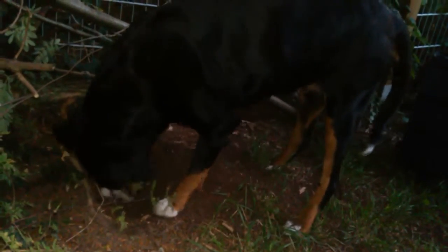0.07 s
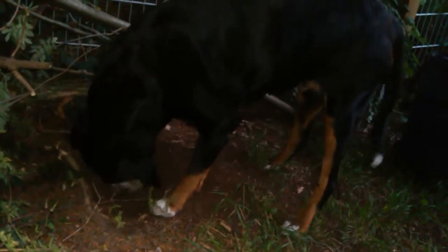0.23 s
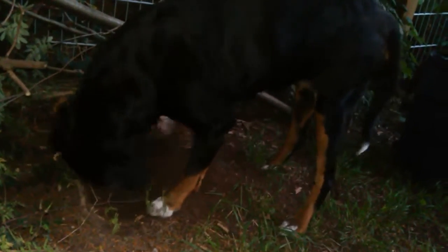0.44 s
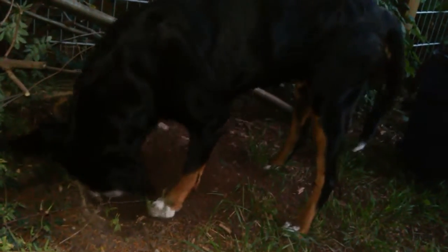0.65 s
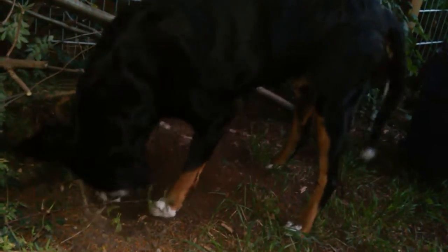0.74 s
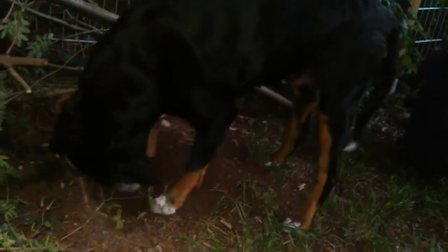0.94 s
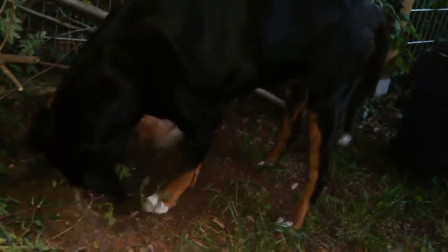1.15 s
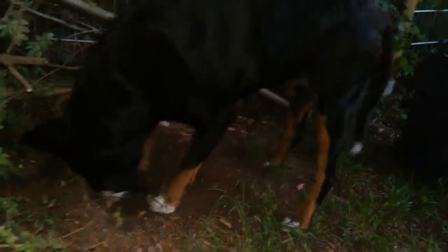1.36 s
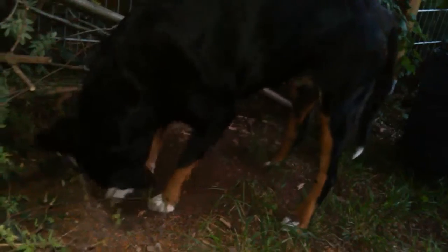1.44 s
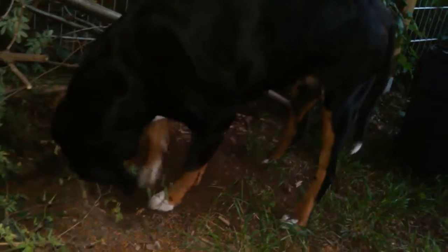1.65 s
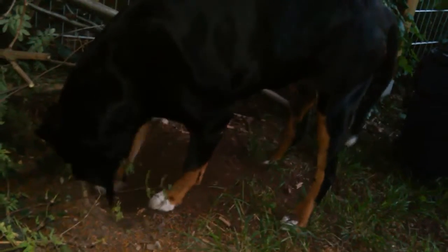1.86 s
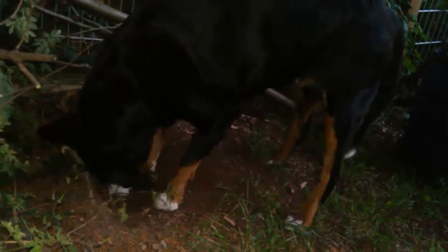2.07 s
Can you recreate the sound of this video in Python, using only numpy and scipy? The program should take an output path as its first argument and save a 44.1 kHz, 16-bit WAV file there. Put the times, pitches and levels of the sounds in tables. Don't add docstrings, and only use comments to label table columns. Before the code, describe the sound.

Close dog digging outdoors: one short earthy scrape, a dense spray of grit and dry leaves with tiny metallic chinks, near quiet, then a heavier scrape breaking clods, ending with a soft paw step and twig crackle.

```python
import sys
import numpy as np
from scipy import signal
from scipy.fft import rfft, irfft
from scipy.io import wavfile

SR = 44100
rng = np.random.default_rng(int(sys.argv[2]) if len(sys.argv) > 2 else 0)


def volts(x):
    e = np.asarray(x, float) / 20
    return 10 ** e


def store_wav(level_fs):
    pcm = np.round(np.clip(np.atleast_2d(level_fs), -1, 1) * 32767)
    wavfile.write(sys.argv[1], SR, pcm.T.astype(np.int16))


N = 92610
T = np.arange(N) / SR


def rms_one(x):
    return x / np.sqrt(np.mean(x ** 2) + 1e-20)


def at_hz(points, hz):
    point_hz, db = np.transpose(points)
    return np.interp(np.log(hz), np.log(point_hz), db)


def butter(x, hz, side, order=2):
    return signal.sosfilt(signal.butter(order, hz, side, fs=SR, output="sos"), x)


def drift(rate_hz):
    r = np.exp(-2 * np.pi * rate_hz / SR)
    noise = rng.standard_normal(N + SR)
    return rms_one(signal.lfilter([1], [1, -2 * r, r * r], noise)[SR:])


def ring(clicks, hz, t60_s):
    w = 2 * np.pi * hz / SR
    out = clicks + 1e-18
    for decay_s in (t60_s, t60_s / 5):
        r = volts(-60 / (decay_s * SR))
        out = signal.lfilter([.5, 0, -.5], [1, -2 * r * np.cos(w), r * r], out)
    return out * 3 * (1 - r)


def click(s, db):
    out = np.zeros(N)
    out[int(s * SR)] = volts(db)
    return out


def burst(s, peak_db, t60_s, edge_hz=None):
    t = np.arange(4096) / SR
    puff = volts(-60 * t / t60_s) * rng.standard_normal(len(t))
    if edge_hz:
        puff = butter(puff, edge_hz, "high", order=4)
    out = np.zeros(N + len(t))
    start = int(s * SR)
    out[start:start + len(t)] = volts(peak_db) * puff / np.abs(puff).max()
    return out[:N]


def grains(per_s, spectrum, span_hz, spread_db, clump_db, cycles, count=24):
    clump = clump_db * (drift(70) + .15 * drift(11))
    sizes = volts(spread_db * np.minimum(rng.exponential(1, N), 5) + clump) * rng.choice([-1, 1], N)
    born = rng.random(N) < per_s * volts(clump) / SR
    pitch = rng.integers(0, count, N)
    out = np.zeros(N)
    for k, hz in enumerate(np.geomspace(*span_hz, count)):
        hits = sizes * born * (pitch == k)
        out += volts(at_hz(spectrum, hz)) * hz * ring(hits, hz, cycles / hz)
    return rms_one(out)


# (frequency [Hz], density [dB per Hz])
YARD_SPECTRUM = [(15, 2.5), (25, -3.5), (48, -6), (115, -13), (300, -22.5), (655, -15.5), (1080, -24),
                 (3000, -30.5), (5000, -34), (9000, -41)]


def yard():
    hz = np.arange(N // 2 + 1) * SR / N + 1
    shape = volts(at_hz(YARD_SPECTRUM, hz)) * (hz < YARD_SPECTRUM[-1][0])
    air = irfft(rfft(rng.standard_normal(N)) * shape, N)
    return volts(-59.5 + 0.87 * drift(1)) * rms_one(air)


def tread():
    s, level_db, _ = np.transpose(STIR)
    murmur = rms_one(butter(rng.standard_normal(N), (51.6, 160.5), "band"))
    follows = 0.34
    return volts(-55.5 + follows * (np.interp(T, s, level_db) + 32.0)) * murmur


# (time [s], peak [dB], pitch [Hz], second touch after [s])
STEPS = [
    (.725, -40, 507, 0.014),
    (1.352, -51, 606, 0.0075),
    (1.9733, -40.5, 727, .014),
]


def steps():
    knock_cycles, push_hz, push_db, push_t60_s = 16, 240, -5.5, 0.03
    slap_hz, slap_db, slap_lag_s = 1760, -1, 0.00203
    out = np.zeros(N)
    for s, db, hz, after_s in STEPS:
        touches = click(s, db) - click(s + after_s, db - 3) + burst(s, db - 19, 2 * push_t60_s)
        out += ring(touches, hz, knock_cycles / hz)
        out += volts(push_db) * ring(touches, push_hz, push_t60_s)
        out += volts(slap_db) * ring(click(s + slap_lag_s, db), slap_hz, knock_cycles / slap_hz)
    return out


# (time [s], peak [dB], low edge [Hz])
CRACKS = [(.001, -36, 5500), (0.015, -24, 5800), (.026, -23, 5800), (0.077, -24, 9100), (.159, -29, 12000),
          (.305, -9.5, 5870), (.350, -23, 5950), (.369, -31, 8000), (.389, -19, 8000), (.412, -19, 8000),
          (0.465, -19, 8000), (.554, -22, 9000), (.655, -19, 8900), (0.802, -13, 4500), (.809, -14, 5000),
          (.824, -3, 7000), (.901, -10, 6500), (0.964, -17, 7000), (1.021, -15, 5000), (1.088, -13.5, 8100),
          (1.115, -23, 6000), (1.318, -33, 5040), (1.346, -26, 9000), (1.411, -33, 6500),
          (1.432, -26, 6000), (1.465, -26, 9000), (1.498, -25, 9000), (1.529, -28, 6000),
          (1.631, -19, 7000), (1.828, -34, 9000), (1.875, -36, 9000), (1.885, -32, 5500),
          (1.916, -28, 9500), (1.947, -37, 6800), (1.966, -42, 6000), (1.974, -23.5, 6000),
          (1.989, -36, 6000), (1.9935, -32, 8900), (2.008, -37, 8500), (2.013, -37, 8500),
          (2.027, -41, 6500), (2.052, -48, 6000), (2.06, -45, 8500), (2.068, -46, 7500)]


def cracks():
    return sum(burst(s, db + 3, .011, edge_hz) for s, db, edge_hz in CRACKS)


# (time [s], peak [dB], first pitch [Hz], second pitch [Hz], second relative [dB])
SNAPS = [(.072, -40.5, 3130, 6500, 1), (.148, -49, 4600, 4100, 4), (.448, -32.5, 3250, 1960, -7.5),
         (.954, -33, 2020, 2600, -6), (1.436, -53, 1910, 2920, -10), (1.988, -50, 2130, 3300, -3),
         (2.01, -54, 1900, 2640, 4), (2.027, -50, 2100, 3300, 3), (2.067, -55.5, 2200, 3560, 3),
         (0.213, -23, 1350, 2630, -10), (0.5801, -28, 1680, 4800, 6), (0.5815, -22.5, 6000, 3920, -7),
         (0.778, -24.5, 1650, 3230, -2), (.822, -26, 1800, 2900, -13), (0.829, -26.5, 1760, 2360, -1),
         (.880, -30.5, 2340, 1780, -4), (.886, -37.5, 1980, 2430, -5), (.922, -33, 2270, 2700, -14),
         (.812, -34, 2520, 3250, 0), (0.941, -29, 1760, 2300, -1), (1.015, -38, 1790, 3000, 0),
         (1.0407, -26, 3020, 5120, 11), (1.0397, -13.5, 5900, 9200, -2.5), (1.318, -51, 2440, 3260, 0.5),
         (1.49, -36, 2300, 3380, -2), (1.551, -24, 2350, 4170, 3), (1.54, -24, 946, 1790, -7.5),
         (1.591, -29, 1660, 2370, 7), (1.651, -23, 900, 2550, -4), (1.662, -29, 1450, 3700, -6),
         (1.9743, -37, 1840, 2410, 1), (1.977, -37, 3350, 4770, 10)]


def snaps():
    first_cycles, second_cycles = 18.0, 30.0
    out = np.zeros(N)
    for s, db, first_hz, second_hz, second_db in SNAPS:
        out += ring(click(s, db), first_hz, first_cycles / first_hz)
        out += ring(click(s, db + second_db), second_hz, second_cycles / second_hz)
    return out


# (time [s], peak [dB], upper modes relative [dB])
CHINKS = [
    (.768, -25, 0),
    (0.777, -29, 12),
    (0.7824, -15.5, 5.5),
    (0.8076, -25, -5),
    (.827, -27, -1),
    (0.8447, -13, 4),
    (.852, -24, -8),
    (0.864, -37, 0),
    (.955, -35, -6),
]
# (frequency [Hz], level [dB], t60 [s])
TAG_MODES = [(6560, 0, .009), (9120, 0, .005), (11100, -7, .004), (12900, -11, .004), (15100, -8, .004)]


def tag():
    slide_t60_s, slide_db, pitch_wander = 0.0025, -7, .015
    off = 1 + pitch_wander * rng.standard_normal((len(CHINKS), len(TAG_MODES)))
    rough = rng.uniform(.3, 1.3, N)
    out = np.zeros(N)
    for k, (hz, mode_db, t60_s) in enumerate(TAG_MODES):
        drive = np.zeros(N)
        for i, (s, peak_db, upper_db) in enumerate(CHINKS):
            slide = (T >= s) * volts(peak_db + slide_db - 60 * np.clip(T - s, 0, 1) / slide_t60_s)
            drive += np.sin(2 * np.pi * T * hz * off[i, k]) * slide * volts(mode_db + upper_db * (k > 0))
        out += ring(rough * drive, hz, t60_s)
    return out


# (time [s], level [dB], coarse crumbs relative [dB])
STIR = [(0, -36, -9), (0.127, -46, -14), (0.179, -38, -16.5), (.225, -29, -8.5), (0.482, -30.5, -11.5),
        (0.631, -40.5, -14), (0.757, -30, -12), (0.833, -15, -13), (0.972, -29.5, -8), (1.141, -35.5, -12),
        (1.235, -51.5, -15), (1.309, -52, -19), (1.33, -46.5, -18.5), (1.532, -29, -9.5),
        (1.704, -21.5, -9), (1.954, -56, -12), (1.999, -41, -7), (2.1, -58, -9.5)]
# (frequency [Hz], density [dB per Hz])
GRIT_SPECTRUM = [(4300, -12), (5400, -7), (6310, 0.5), (8590, -7), (10600, 3), (13200, 5.5), (14700, 7),
                 (15700, -15.5)]
# (frequency [Hz], density [dB per Hz])
CRUMB_SPECTRUM = [(240, -31), (400, -26.5), (456, -10), (1110, -17.5), (1760, -5.5), (1980, -9.5),
                  (2420, -4.5), (3790, -7.5), (5500, 2), (7150, -32), (12100, -120)]


def rustle():
    s, level_db, coarse_db = np.transpose(STIR)
    stir_db = np.interp(T, s, level_db)
    many = volts(.35 * (stir_db + 30))
    grit = grains(40000 * many, GRIT_SPECTRUM, (4300, 16000), spread_db=3.0, clump_db=1.0, cycles=16.0)
    crumbs = grains(9000 * many, CRUMB_SPECTRUM, (300, 5500), spread_db=3.1, clump_db=1.2,
                    cycles=14.0, count=32)
    pebbles = grains(900 * many, GRIT_SPECTRUM, (6500, 14000), spread_db=3.5, clump_db=2.0,
                     cycles=5.0, count=6)
    mix = grit + volts(-10.5) * pebbles + volts(np.interp(T, s, coarse_db)) * crumbs
    return volts(stir_db + 0.04) / np.sqrt(many) * mix


# (claws bite [s], pad lands [s], full weight [s], lets go [s], level [dB])
RAKES = [
    (.183, .184, .215, .265, -27),
    (1.533, 1.553, 1.595, 1.63, -23),
]


def stroke(fade_db_per_s, lag_s=0, start=1, bite_db_per_s=269):
    t = T - lag_s
    sag_db = -6.5
    out = np.zeros(N)
    for row in RAKES:
        full_s, go_s, level_db = row[2:]
        times = [full_s - 1, full_s, go_s, go_s + 1]
        press_db = np.interp(t, times, [-bite_db_per_s, 0, sag_db, -fade_db_per_s])
        out += (t > row[start] - lag_s) * volts(level_db + press_db)
    return out


# (frequency [Hz], density [dB per Hz])
GROUND_SPECTRUM = [(120, -2), (180, -9), (250, 1), (330, -12), (390, -12.5), (450, -6), (700, -24)]
# (frequency [Hz], density [dB per Hz])
DEEP_SPECTRUM = [(65, -3), (90, 4), (130, -12.5), (200, 0.5)]
# (frequency [Hz], density [dB per Hz])
CRUNCH_SPECTRUM = [(290, -30), (500, -2.5), (560, -6.5), (1160, -3), (1300, -49), (1380, -10.5), (2490, -7),
                   (5500, -6.5), (7150, -39), (12100, -120)]
# (time [s], peak [dB], pitch [Hz])
GIVES = [(.186, -30, 240), (.198, -36, 233), (.213, -24.5, 249), (0.248, -22, 212), (0.258, -34, 240),
         (1.564, -25, 254), (1.575, -20.5, 223), (1.593, -19.5, 314), (1.617, -16, 274), (1.63, -21, 360),
         (1.663, -25, 274)]


def rakes():
    ground = grains(2500, GROUND_SPECTRUM, (120, 700), spread_db=1.5, clump_db=.6, cycles=10.0, count=14)
    ground = ground * stroke(fade_db_per_s=212)
    deep = grains(600, DEEP_SPECTRUM, (65, 200), spread_db=1.5, clump_db=.6, cycles=8.0, count=8)
    deep = deep * stroke(fade_db_per_s=97, lag_s=0.033)
    crust = grains(9000, CRUNCH_SPECTRUM, (450, 5500), spread_db=2.3, clump_db=1.0, cycles=14.0, count=30)
    splinter_hz, crust_fade_db_per_s = 1650, 114
    dull = butter(crust, splinter_hz, "low") * stroke(crust_fade_db_per_s, start=0, bite_db_per_s=292)
    bright = butter(crust, splinter_hz, "high") * stroke(crust_fade_db_per_s, bite_db_per_s=330)
    crunch = dull - volts(-1) * bright
    gives = sum(ring(click(s, db + 0.5), hz, 0.059) for s, db, hz in GIVES)
    return volts(-1.5) * ground + volts(-8.5) * deep + volts(1.5) * crunch + gives


def scene():
    background = yard() + tread()
    litter = steps() + cracks() + snaps() + tag()
    return (background + litter + rustle() + rakes())[None]


def low_pass(x):
    return signal.sosfilt(signal.butter(12, 16870, fs=SR, output="sos"), x)


# (frequency [Hz], width [Hz], share taken out [1])
MIC_DIPS = [(5020, 2060, 0.7), (7810, 630, 0.25)]


def record(dry):
    x = dry
    for hz, width_hz, share in MIC_DIPS:
        x = x - share * signal.lfilter(*signal.iirpeak(hz, hz / width_hz, fs=SR), x)
    x = signal.sosfilt(signal.ellip(12, .5, 70, 15830, fs=SR, output="sos"), x)
    mix = 1.542 * np.tanh(x / 1.766)
    return low_pass(mix)


dry = scene()
out = record(dry)
store_wav(out)
```